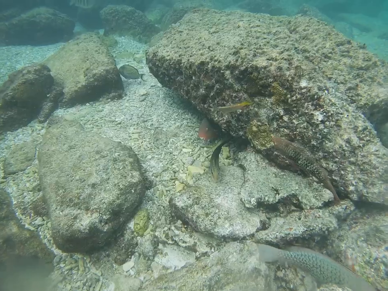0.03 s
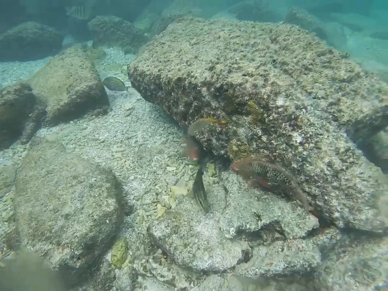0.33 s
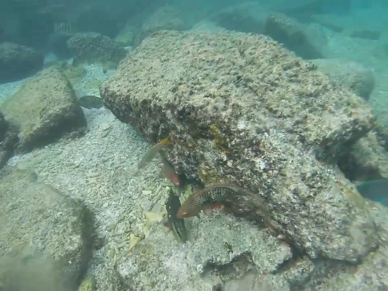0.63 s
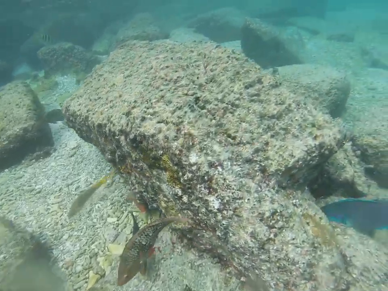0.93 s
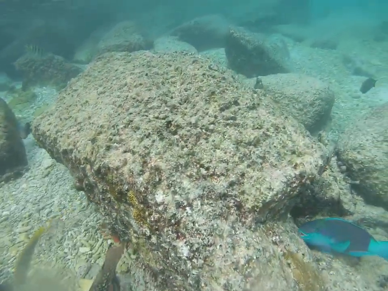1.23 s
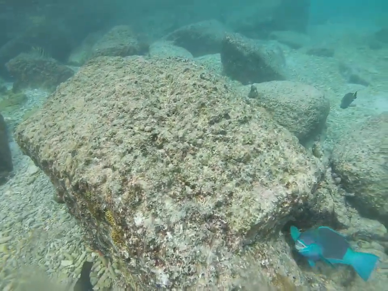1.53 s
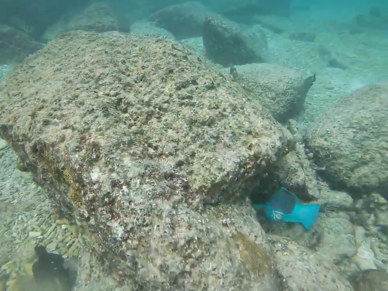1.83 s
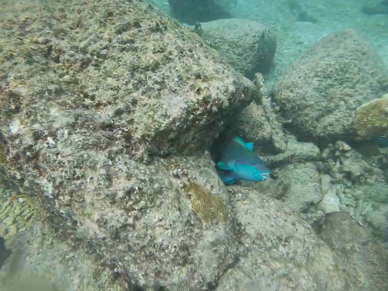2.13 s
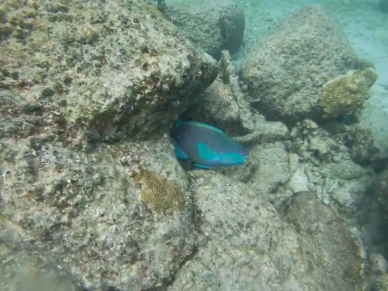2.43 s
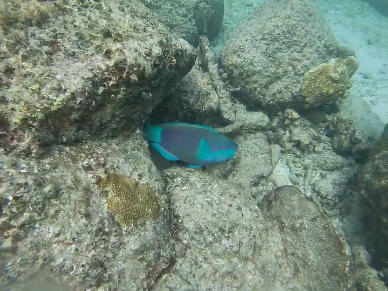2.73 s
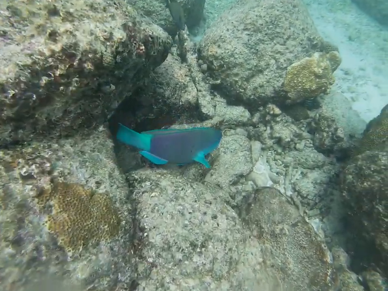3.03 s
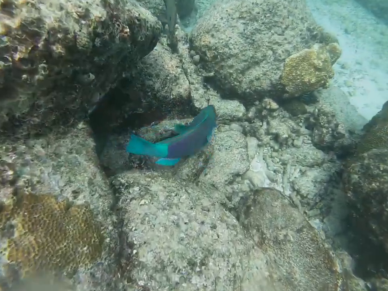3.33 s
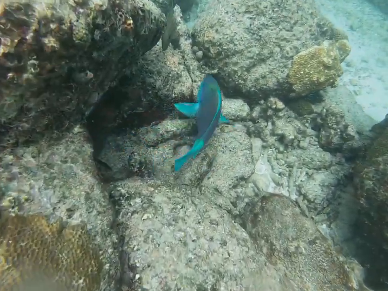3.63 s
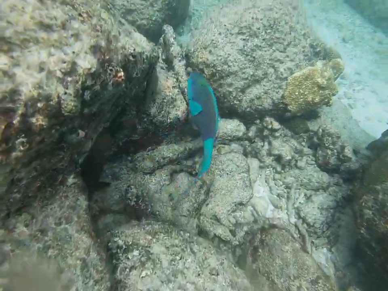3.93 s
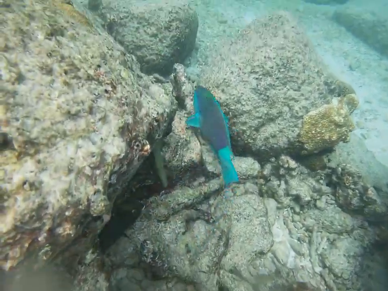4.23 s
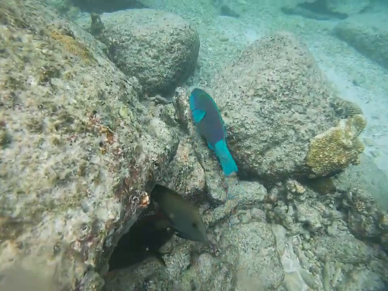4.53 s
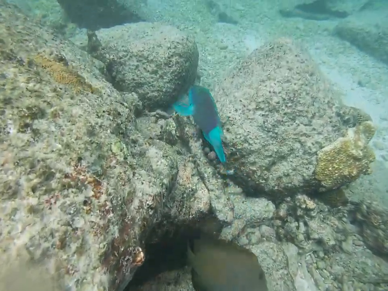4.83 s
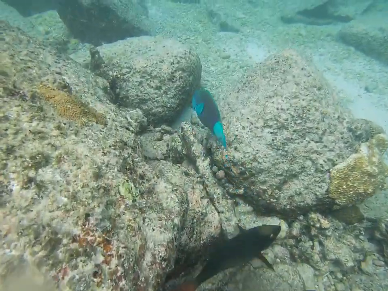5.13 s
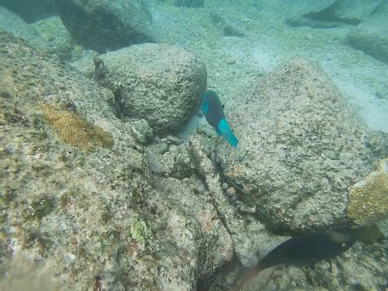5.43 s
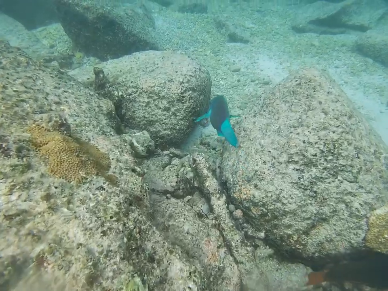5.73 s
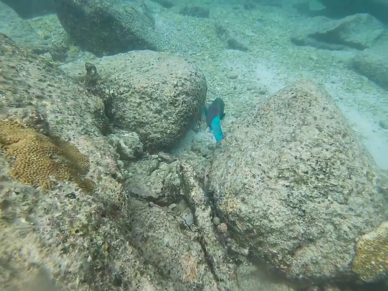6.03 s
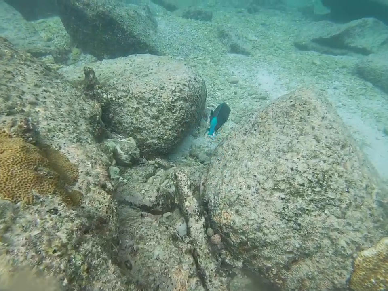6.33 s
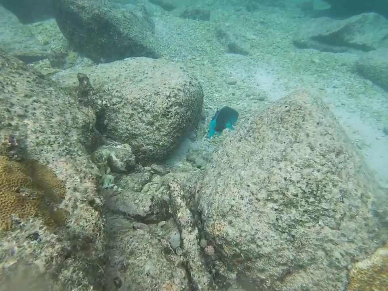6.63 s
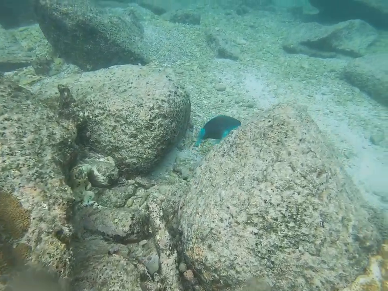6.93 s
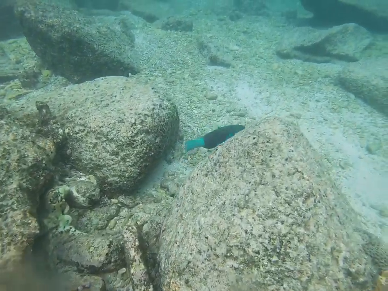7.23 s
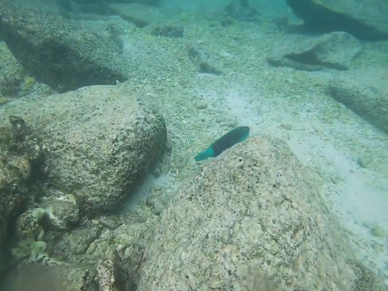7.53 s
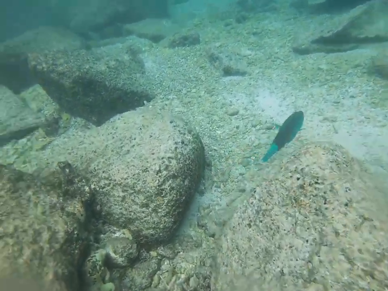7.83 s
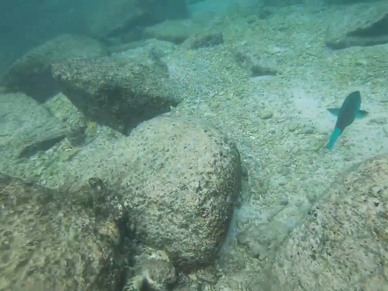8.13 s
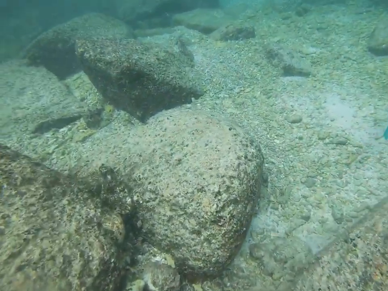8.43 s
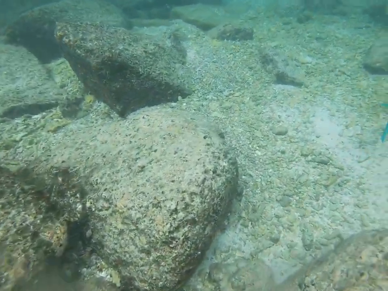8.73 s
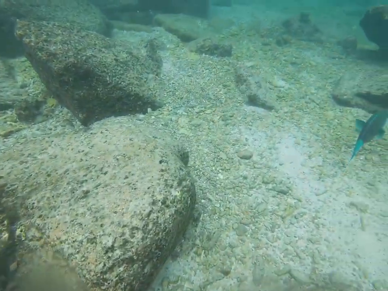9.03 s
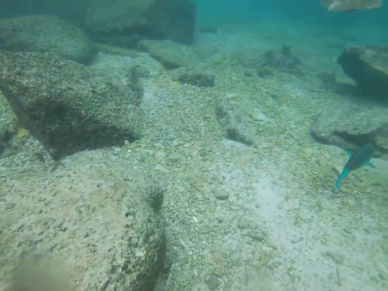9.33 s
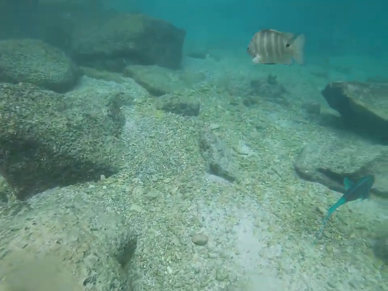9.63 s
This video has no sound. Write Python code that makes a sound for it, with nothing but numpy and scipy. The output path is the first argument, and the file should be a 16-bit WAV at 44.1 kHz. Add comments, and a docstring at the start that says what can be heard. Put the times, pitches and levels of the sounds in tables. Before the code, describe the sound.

Heard from inside a waterproof camera case swimming over a reef, water rumbles and buffets in uneven waves. Shrimp crackle faintly all along, with a few sharper snaps nearby, while the handled case clicks and knocks and little bubbles ring. A short gush and a knock come early; a deep thump and a gurgling surge come near the end.

```python
"""Swimming over a rocky reef

A camera in a waterproof case swims along; eddies rumble, buffet and gurgle past it.
Snapping shrimp crackle near and far, each snap a collapsing cavity heard through the case.
The case knocks, ticks and scrapes in the hand, water bumps and gushes on it, and small bubbles ring."""
import sys
import numpy as np
from scipy import signal
from scipy.fft import rfft, irfft, next_fast_len
from scipy.io import wavfile
from scipy.ndimage import uniform_filter1d

SR = 44100
rng = np.random.default_rng(int(sys.argv[2]) if len(sys.argv) > 2 else 0)


def store_wav(level_fs):
    """Save 16-bit WAV to argv[1]."""
    pcm = np.round(np.clip(np.atleast_2d(level_fs), -1, 1) * 32767)
    wavfile.write(sys.argv[1], SR, pcm.T.astype(np.int16))


N = 431738
TIME = np.arange(N) / SR
TAPS = 4096
HZ = np.fft.rfftfreq(TAPS, 1 / SR)


def amp(db):
    """Decibels to gain."""
    return 10 ** (np.asarray(db) / 20)


def unit_rms(x):
    """Scales to rms 1."""
    return x / np.sqrt(np.mean(x ** 2) + 1e-20)


def unit_peak(x):
    """Scales the loudest 1.5 ms to rms 1."""
    return x / np.sqrt(uniform_filter1d(x ** 2, 66).max() + 1e-20)


def steadied(x, steady_s):
    """Evens a sound to rms 1 over spans longer than steady_s."""
    power = abs(signal.hilbert(x)) ** 2 / 2
    span = int(steady_s * SR)
    return x / np.sqrt(abs(uniform_filter1d(uniform_filter1d(power, span), span)) + 1e-20)


def add(mix, start_s, sound):
    """Mixes a sound in at start_s."""
    part = mix[max(round(start_s * SR), 0):][:len(sound)]
    part += sound[:len(part)]


def eq(points, hz=HZ):
    """Gain along a curve of (freq_hz, gain_db) points."""
    freq_hz, gain_db = np.transpose(points)
    return amp(np.interp(np.log(hz + 1), np.log(freq_hz + 1), gain_db))


def body(modes, shift=1, top_hz=11940):
    """Gain of steep-sided resonances; the case passes little above top_hz."""
    power = sum((amp(db) / (1 + 2 * ((HZ / shift - hz) / width) ** 2) ** 1.04) ** 2
                for hz, width, db in modes)
    return np.sqrt(power) / (1 + (HZ / top_hz) ** 12)


def ring(drive, colour):
    """Rings a drive through the minimum-phase filter of this colour."""
    log_gain = np.log(np.maximum(np.r_[colour, colour[-2:0:-1]], 1e-5))
    response = np.fft.ifft(np.exp(np.conj(signal.hilbert(log_gain)))).real
    return signal.oaconvolve(drive, response[:TAPS // 2])


def impact(scatter, decay_s, size=2048):
    """One impulse and its quickly fading scatter."""
    drive = rng.standard_normal(size) * np.exp(-np.arange(size) / SR / decay_s)
    drive *= scatter / np.linalg.norm(drive)
    drive[0] += 1
    return drive


def clicks(per_s, spread_db, max_spreads, size=N):
    """Random impulses, most small and a few large."""
    gains = amp(spread_db * np.minimum(rng.exponential(1, size), max_spreads))
    return gains * rng.choice([-1, 1], size) * (rng.random(size) < per_s / SR)


def eddies(colour, steady_s):
    """Low turbulent noise of even strength."""
    size = next_fast_len(N)
    spectrum = rfft(rng.standard_normal(size)) * eq(colour, np.fft.rfftfreq(size, 1 / SR))
    return steadied(irfft(spectrum, size), steady_s)[:N]


def ping(hz, t60_s, rise_s, glide):
    """A damped sine that starts softly and glides as it dies."""
    t = np.arange(int(t60_s * SR)) / SR
    envelope = (1 - np.exp(-t / rise_s)) * amp(-60 * t / t60_s)
    return envelope * np.sin(2 * np.pi * hz * t * (1 + glide * t / t60_s))


def bubbling(colour, per_s, cycles, spread_db):
    """Bubbles of every size at random moments, each ringing for roughly this many cycles."""
    out = np.zeros(N)
    low_hz, high_hz = colour[0][0], colour[-1][0]
    for when, pitch, strength, sustain in rng.random((int(per_s * N / SR), 4)):
        hz = low_hz * (high_hz / low_hz) ** pitch
        gain = eq(colour, hz) * amp(spread_db * min(-np.log(1 - strength), 3))
        bubble = ping(hz, cycles * (.5 + sustain) / hz, rise_s=1.5 / hz, glide=.042)
        add(out, when * N / SR, gain * bubble)
    return unit_rms(out)


def wander(level_db, depth_db, top_hz=6):
    """A gain that drifts around level_db, at rates in the two octaves below top_hz."""
    t = np.linspace(0, N / SR, 1000)
    rates = top_hz * np.geomspace(.25, 1, 24)
    drift = sum(np.sin(2 * np.pi * (hz * t + turn)) for hz, turn in zip(rates, rng.random(24)))
    return amp(level_db + depth_db * np.interp(TIME, t, unit_rms(drift)))


def swell(middle_s, length_s):
    """A smooth rise and fall of height 1."""
    return np.cos(np.pi * np.clip((TIME - middle_s) / length_s, -.5, .5)) ** 2


def burst(length_s, rise_share=.2, fade_db=16):
    """An envelope that builds quickly, is fade_db down at length_s and dies away."""
    age = np.arange(int(2 * length_s * SR)) / (length_s * SR)
    fade = np.maximum(age - rise_share, 0) / (1 - rise_share)
    return np.minimum(age / rise_share, 1) * amp(-fade_db * fade ** 1.15)


def bursts(rows):
    """The summed envelope of a table of bursts."""
    level = np.zeros(N)
    for start_s, length_s, db, *_ in rows:
        add(level, start_s, amp(db) * burst(length_s))
    return level


def strays(*ranges, per_s, level_db):
    """Rows for faint random events: start_s, level_db, then a value from each range."""
    limits = [(0, N / SR), (level_db - 2, level_db + 2), *ranges]
    return [[rng.uniform(*span) for span in limits] for _ in range(round(per_s * N / SR))]


# Flow past the case as the swimmer speeds up and drifts: time_s, level_db
FLOW = [(0, -42.5), (.6, -44.5), (1.0, -39.5), (1.38, -38), (1.6, -29), (2.7, -29.5), (3.5, -33),
        (4.3, -32.5), (4.9, -42), (5.3, -32), (5.9, -35.5), (6.55, -41), (7.2, -37.5), (7.9, -27.5),
        (8.42, -36), (8.85, -30.5), (9.2, -34), (9.79, -42)]
CRUISE_DB = -35


def flow(reference_db=0):
    """Strength of the flow against a reference level."""
    time_s, db = np.transpose(FLOW)
    return amp(np.interp(TIME, time_s, db) - reference_db)


# Shoves of water, one swell of rumble each: middle_s, length_s, level_db
PUSHES = [(1.155, 0.3, -30.5), (1.632, 0.23, -27.5), (2.356, 0.052, -21.5), (2.574, 0.035, -20.5),
          (3.738, 0.1, -27), (4.549, 0.1, -27), (5.544, 0.064, -21.5), (6.983, 0.34, -32),
          (7.473, 0.29, -28.5), (7.879, 0.2, -20.5), (8.222, 0.29, -25.5), (8.608, 0.11, -26.5),
          (8.842, 0.37, -27)]
# Tone of the slow sway and of the large eddies: freq_hz, gain_db
SWAY_EQ = [(2, -18.5), (8, -5), (13.5, -7.5), (17, -3), (22, -15), (40, -54.5), (100, -100), (6000, -145)]
RUMBLE_EQ = [(10, -13.5), (20, -3.5), (28, 2), (33, 2), (39, -16), (50, -15), (70, -28.5), (120, -56),
             (300, -83), (900, -100), (6000, -140)]


def rumble():
    """The case sways and large eddies rumble, growing with the flow."""
    level = flow() * wander(-2, depth_db=2)
    for middle_s, length_s, db in PUSHES:
        level = np.hypot(level, amp(db) * swell(middle_s, length_s))
    sway = amp(-1) * eddies(SWAY_EQ, steady_s=.095)
    return level * (sway + amp(.5) * eddies(RUMBLE_EQ, steady_s=.097))


# Jolts of the case that shed eddies: start_s, length_s, level_db
JOLTS = [(.45, 0.15, -32), (1.1, 0.053, -40), (1.56, 0.078, -35), (1.88, 0.17, -61), (2.28, 0.24, -42),
         (2.57, 0.14, -52), (3.5, 0.47, -48.5), (3.7, 0.063, -57), (4.28, 0.22, -50.5), (7.76, 0.14, -25.5),
         (8.15, 0.3, -45), (8.57, 0.23, -41.5), (8.88, 0.084, -36.5), (9.39, 0.16, -37)]
# Tone of the buffeting: freq_hz, gain_db
BUFFET_EQ = [(25, -31), (50, -15), (68, -1.5), (82, 11.5), (110, -5), (200, -15.5), (400, -46), (1000, -91)]


def buffeting():
    """Smaller eddies beat on the case, harder with the flow and at each jolt."""
    level = np.hypot(flow(CRUISE_DB) ** .91 * wander(-62, depth_db=3), bursts(JOLTS))
    return amp(-5.5) * level * eddies(BUFFET_EQ, steady_s=.11)


# Gurgles round the case: start_s, length_s, level_db, pitch_hz
GURGLES = [(0.465, 0.39, -38, 174.1), (0.685, 0.07, -39, 184), (0.829, 0.35, -58.5, 191.4),
           (1.499, 0.055, -49.5, 145.5), (1.566, 0.051, -49, 151), (1.575, 0.097, -57.5, 371),
           (1.721, 0.22, -60, 163.6), (1.972, 0.036, -56, 360), (1.892, 0.13, -48, 150.8),
           (2.583, 0.038, -48, 188), (3.203, 0.12, -45.5, 211.4), (3.238, 0.052, -51, 382),
           (3.309, 0.095, -56, 245), (3.561, 0.075, -54, 152), (3.702, 0.066, -66, 152),
           (4.004, 0.056, -44, 160.3), (4.267, 0.041, -53.5, 143), (4.633, 0.034, -62, 384),
           (4.804, 0.15, -54.5, 199.4), (5.779, 0.028, -56, 385), (6.217, 0.42, -60.5, 220.6),
           (6.892, 0.053, -45, 191), (7.361, 0.12, -53.5, 243), (7.672, 0.049, -46, 230),
           (7.764, 0.11, -36.5, 210.7), (7.977, 0.048, -50.5, 169), (8.277, 0.021, -32, 219),
           (8.341, 0.082, -46.5, 220), (8.562, 0.1, -52.5, 168.6), (8.38, 0.092, -53, 386),
           (8.808, 0.13, -44, 188.6), (8.83, 0.074, -55, 380), (8.836, 0.74, -55.5, 205),
           (9.446, 0.47, -56, 201.3), (9.72, 0.065, -48.5, 160)]
# Tone of a gurgle pitched at GURGLE_HZ: freq_hz, gain_db
GURGLE_EQ = [(50, -27.5), (120, -4.5), (160, 5), (210, 0.5), (290, -6), (400, -8.5), (550, -21.5),
             (1000, -20.5), (3000, -94)]
GURGLE_HZ = 172.6


def gurgling():
    """Small eddies and gulps of air: a faint trickle, and bursts at their own pitches."""
    gulps = bubbling(GURGLE_EQ[1:-2], per_s=120, cycles=16, spread_db=1.2)
    churn = amp(-8) * eddies(GURGLE_EQ, steady_s=.029) + amp(-7) * gulps
    out = churn * flow(CRUISE_DB) ** .2 * wander(-67.5, depth_db=3)
    for start_s, length_s, db, hz in GURGLES:
        level = amp(db) * burst(length_s)
        playhead = (start_s * SR + np.arange(len(level)) * hz / GURGLE_HZ) % N
        add(out, start_s, level * np.interp(playhead, np.arange(N), churn))
    return out


def lull():
    """A brief dip in the crackle and rustle."""
    return amp(-6 * swell(middle_s=1.35, length_s=.74))


# Resonances that let sound from the water into the case: freq_hz, width_hz, gain_db
CASE_MODES = [(810, 208, -0.5), (1382, 188, 11), (1763, 112, 5), (2145, 370, -1), (2732, 214, 0),
              (3130, 680, -3.5), (4070, 350, -2.5), (5120, 490, -2), (5905, 860, -10), (8106, 790, -14.5),
              (9330, 2400, -21), (12100, 600, -28), (14300, 730, -33)]


def shrimp_crackle():
    """Countless far snaps merge into a sizzle; nearer colonies stand out."""
    case = body(CASE_MODES)
    far = unit_rms(ring(clicks(5000, 1.2, 2.1), case)[:N])
    near = np.zeros(N)
    for centre_hz in np.geomspace(2200, 9500, 14):  # each colony has its own brightness
        colour = case / (1 + (np.log2(HZ / centre_hz + 1e-3) / .2) ** 2)
        snaps = signal.oaconvolve(clicks(26, 2.9, 3), impact(scatter=24, decay_s=.01))
        near += ring(snaps, colour)[:N]
    return lull() * wander(-61, depth_db=.23, top_hz=1.334) * unit_rms(far + .75 * unit_rms(near))


# Resonances of a small stiff fitting on the case: freq_hz, width_hz, gain_db
FITTING_MODES = [(227, 290, -25.5), (900, 200, -60), (1414, 120, 10), (1904, 380, -8.5)]
# Strength of stray bubbles by pitch: pitch_hz, gain_db
PIP_EQ = [(700, -16), (850, 2), (1100, -12), (1450, 13), (1900, -9.5), (2500, -1), (3400, -21.5)]


def rustle():
    """Water rustles and pips on the case, louder when it gurgles."""
    level = np.hypot(lull() * wander(-59, depth_db=4.5), amp(-2.5) * bursts(GURGLES))
    patter = unit_rms(ring(clicks(400, 2.2, 5.5), body(FITTING_MODES))[:N])
    pips = bubbling(PIP_EQ, per_s=190, cycles=27, spread_db=2.6)
    return level * (amp(-10) * patter + amp(-8) * pips)


# Passing bubble clouds: start_s, length_s, level_db
SWISHES = [(-0.003, 0.32, -57.5), (0.444, 0.28, -55), (3.179, 0.063, -49), (4.735, 0.13, -54.5),
           (5.27, 0.34, -57.5), (7.006, 0.2, -57.5), (8.654, 0.48, -51.5), (9.184, 0.58, -54.5)]
# Strength of their bubbles by pitch: pitch_hz, gain_db
SWISH_EQ = [(500, -44), (1000, -68), (1300, 13), (1600, 12.5), (1900, 4), (2300, 4), (3000, -34), (6000, 4)]


def swishes():
    """Clouds of fine bubbles swell and pass."""
    level = np.zeros(N)
    for start_s, length_s, db in SWISHES:
        add(level, start_s, amp(db) * signal.windows.tukey(int(length_s * SR), .8))
    return level * bubbling(SWISH_EQ, per_s=1800, cycles=22, spread_db=2)


# Single bubbles, and the 1.1 kHz ring left by the knock at 8.28 s: start_s, level_db, pitch_hz, ring_s
BUBBLES = [(.112, -34.5, 1430, 0.03), (.195, -34.5, 945, 0.037), (.428, -39, 1180, 0.044),
           (.955, -23, 1473, 0.056), (1.045, -49, 880, 0.058), (1.478, -41, 1440, 0.046),
           (5.385, -49.5, 620, 0.072), (6.165, -38, 1260, 0.047), (6.313, -35.5, 840, 0.047),
           (6.718, -43.5, 1820, 0.052), (6.915, -43, 833, 0.062), (8.281, -30, 1100, 0.058),
           (8.786, -31.5, 1345, 0.045), (8.992, -38, 1310, 0.039), (9.068, -45.5, 1750, 0.096),
           (9.712, -32, 1810, 0.03)]


def bubbles():
    """Each small bubble rings, rising a touch in pitch; the knock at 8.28 s rings on the same way."""
    out = np.zeros(N)
    for start_s, db, hz, ring_s in BUBBLES:
        add(out, start_s, amp(db) * ping(hz, ring_s, rise_s=.0031, glide=.0066))
    return out


# Resonances of the case wall, struck directly: freq_hz, width_hz, gain_db
WALL_MODES = [(188, 71, -3), (380, 160, -17), (852, 91, 7), (1053, 47, -0.5), (1265, 180, 1.5),
              (1752, 56, -9)]


def wall(thud_db, edge_db, upper_db=0, shift=1):
    """The wall's hollow colour, with a bright edge from the case modes."""
    hollow = eq([(330, -3.5), (480, .5), (620, 3), (800, .5), (950, -3.5), (1090, 4.5), (1300, 3.5)])
    weight = eq([(250, thud_db), (700, 0), (900, 0), (1150, upper_db)])
    return hollow * (body(WALL_MODES, shift) * weight + amp(edge_db) * body(CASE_MODES))


# Dull knocks on the wall: start_s, level_db, thud_db, upper_modes_db
KNOCKS = [(0.192, -47.5, -10, -5), (0.209, -51, -22, -4), (0.299, -47, -6, -2), (0.396, -37, -35, -4),
          (0.543, -46, 8, -8), (0.6543, -24.5, -11, -3), (0.793, -41.5, -12, 9), (0.833, -47.5, 0, -10),
          (1.01, -48.5, 16, -2), (1.103, -39.5, 20, -8), (1.588, -45, 11, 0), (1.892, -42, -6, 6),
          (1.922, -31, 2, 2), (2.05, -47, 1, -9), (2.321, -40, -11, 4), (2.364, -41.5, 10.5, -0.5),
          (2.788, -44.5, 5, 4), (2.854, -44, -2, -1), (3.004, -42, -23, 4), (3.072, -34.5, 1, 2),
          (3.427, -41.5, 11, -1), (3.48, -49, 12, -1), (3.519, -51, 0, -2), (3.616, -41, 5, 0),
          (3.655, -48.5, 7, -7), (3.735, -36, 0, -13), (3.885, -37, -2, -7.5), (3.918, -45, 4, -9),
          (4.019, -39.5, 3, -13), (4.038, -39.5, 6, -5), (4.092, -42.5, -4, -3), (4.282, -37.5, 2, -5.5),
          (4.358, -48, -10, 0), (4.545, -60, -4, 4), (4.697, -46, 2, 3), (4.728, -48.5, 4, 0),
          (5.168, -55, -5, -2), (5.37, -51, 17, -5), (5.514, -40.5, 0, 0), (5.71, -46.5, -5, 4),
          (5.797, -48.5, -10, -5), (5.985, -47, -4, 5), (6.632, -47, -5, 4), (7.016, -37.5, -6, -5),
          (7.288, -41, -6, 1), (7.865, -36, 9, -5), (8.272, -38, 8, -2), (8.279, -36.5, -18, -1),
          (8.407, -40.5, -2, -1), (8.444, -40, -6, 1), (8.467, -48, 0, -5), (8.589, -32, -8, -3.5),
          (8.842, -51, 9, 1), (9.032, -46.5, -8, -8), (9.117, -42, 6, 7), (9.599, -44, -10, 2)]


def knocks(rise_s=.00049, rattle_s=.0085):
    """Soft contacts build, rattle out and ring the wall."""
    out = np.zeros(N)
    t = np.arange(2048) / SR
    force = t / rise_s * np.exp(1 - t / rise_s) + amp(-8.5) * np.exp(-t / rattle_s)
    for start_s, db, thud_db, upper_db in KNOCKS + strays((-8, 8), (-8, 4), per_s=1.2, level_db=-52):
        shift = 1 + .06 * rng.uniform(-.79, 1)  # pitch varies with where the wall is struck
        colour = wall(thud_db, edge_db=-36, upper_db=upper_db, shift=shift)
        knock = ring(force * rng.standard_normal(len(t)), colour)
        add(out, start_s, amp(db - 2) * unit_peak(knock))
    return out


# Close shrimp snaps: start_s, level_db, low_mids_db, top_db
SNAPS = [(0.2398, -44, -6, -22), (0.545, -44.5, -5, -22), (0.641, -48, -2, -26), (0.6557, -43.5, -22, -12),
         (0.9012, -51, 2, -10), (0.9649, -45.5, -12, -22), (1.194, -41, 1, -9.5), (1.293, -47.5, -12, -37),
         (1.3472, -47.5, -15.5, -41), (1.511, -51.5, -13, -11), (1.538, -58, -15, -12),
         (1.58, -52, -27, -11), (1.626, -45.5, -2, -20), (1.611, -45.5, -3, -22), (1.661, -52, -10, -8),
         (1.712, -46.5, 9, -7), (2.045, -43, 7, -13), (2.116, -45.5, -11, -23), (2.2278, -49, -22, -28),
         (2.334, -43, -2, -15), (2.3202, -34, -9, -28), (2.8025, -37, -5.5, -31), (3.637, -39, 3, -24),
         (3.705, -41.5, -18, -24), (3.9555, -42.5, -8, -14.5), (4.13, -48.5, -13, -10),
         (4.378, -48.5, -7, -36), (4.437, -48.5, 13, 4), (5.015, -54.5, -31, -11),
         (5.3966, -47.5, -13, -25), (5.5702, -48.5, -35, -19), (5.7564, -54.5, -22, -8),
         (6.0015, -35.5, 1, -22), (6.1501, -33, -16.5, -23), (6.337, -47, -8, -13), (6.992, -41, -12, -25),
         (7.117, -51.5, -17, -14), (7.255, -36, -13, -16), (7.472, -48, -8, -15), (7.532, -35, 2.5, -16),
         (7.886, -51, 10, 1), (8.282, -58, 11, -17), (8.4847, -51.5, 5, -4), (9.032, -31.5, -13.5, -19),
         (9.28, -46.5, -4, -2), (9.314, -54, 2, -11)]


def shrimp_snaps(rise_s=.00045, echo_s=.0042, tail_s=.01, echo_hz=5200):
    """A cavity collapses with a crack; rock scatters a duller echo and the reef a crackly tail."""
    out = np.zeros(N)
    t = np.arange(2048) / SR
    for start_s, db, mid_db, top_db in SNAPS + strays((-18, 0), (-26, -8), per_s=3.5, level_db=-58):
        tilt = eq([(900, mid_db - 14.5), (2800, mid_db + .5), (4400, .67 * mid_db), (5700, -1),
                   (6900, -3.5), (8500, top_db + 21.5), (11000, top_db + 10)])
        colour = body(CASE_MODES) * tilt
        collapse, scatter = rng.standard_normal((2, len(t)))
        crack = ring(collapse * t / rise_s * np.exp(1 - t / rise_s), colour)
        echo = amp(.35 * mid_db - 1.5) * scatter * np.exp(-t / echo_s)
        tail = amp(-13.5) * unit_rms(clicks(2500, 2.2, 3, len(t))) * np.exp(-t / tail_s)
        reflections = ring(echo + tail, colour / (1 + (HZ / echo_hz) ** 2))
        add(out, start_s, amp(db) * unit_peak(crack + reflections))
    return out


# Bright ticks of the case's small parts: start_s, level_db, pitch_hz
TICKS = [(0.288, -47, 1730), (0.304, -44.5, 2720), (0.574, -47, 2700), (0.665, -48, 3020),
         (0.733, -33, 1490), (1.922, -36, 1420), (2.5, -43, 1410), (2.52, -42, 1402), (2.994, -44, 1350),
         (3.199, -42, 1510), (3.2117, -40.5, 1380), (3.3675, -48, 1350), (3.4102, -42.5, 1455),
         (3.434, -42, 1490), (3.498, -46, 1530), (3.518, -51, 1440), (3.7958, -45.5, 1360),
         (4.462, -44.5, 1480), (4.532, -48, 1380), (4.6372, -43.5, 1390), (4.857, -38.5, 1463),
         (5.1272, -41.5, 1460), (5.2144, -42, 1500), (5.3, -40.5, 1420), (5.431, -39, 1450),
         (5.73, -46.5, 1530), (6.0025, -35.5, 1540), (6.087, -43, 1480), (6.358, -48, 1390),
         (6.466, -45, 1430), (6.775, -40, 1505), (6.789, -40.5, 1470), (6.8405, -40.5, 1440),
         (7.0086, -40, 1450), (7.0977, -42.5, 1780), (7.139, -44, 1370), (7.271, -48, 2730),
         (7.291, -46, 2930), (7.314, -44, 1360), (7.423, -44, 2630), (7.529, -38, 1430),
         (7.7285, -42, 1450), (8.03, -39, 1387), (8.2794, -29.5, 1660), (8.374, -46.5, 3090),
         (8.443, -43, 1470), (8.557, -50.5, 2660), (8.73, -42.5, 1330), (9.641, -42, 2730)]


def ticks():
    """A small stiff part makes contact and rattles briefly."""
    out = np.zeros(N)
    for start_s, db, hz in TICKS + strays((1300, 1700), per_s=1.2, level_db=-49):
        colour = body(FITTING_MODES, shift=hz / FITTING_MODES[2][0]) + amp(-16.5) * body(CASE_MODES)
        tick = ring(impact(scatter=1.36, decay_s=.0048), colour)
        add(out, start_s, amp(db - .5) * unit_peak(tick))
    return out


def slipping(length_s, colour, per_s, spread_db):
    """A run of tiny slips that rings one colour, at rms 1."""
    size = int(length_s * SR)
    sound = ring(clicks(per_s, spread_db, 4.6, size) * signal.windows.tukey(size, .25), colour)
    return sound / np.sqrt(np.mean(sound[:size] ** 2) + 1e-20)


# Hand scrapes: start_s, length_s, level_db
SCRAPES = [(0.33, 0.36, -52.5), (3.414, 0.12, -62), (4.007, 0.031, -59), (5.351, 0.036, -54.5),
           (7.758, 0.057, -55), (7.839, 0.062, -60), (8.271, 0.013, -40.5), (8.351, 0.15, -56.5),
           (9.296, 0.34, -61.5)]


def scrapes():
    """The hand slips over the case with a low crunch."""
    out = np.zeros(N)
    rasp = body(CASE_MODES) * eq([(1000, -21), (1700, 11), (2800, 9), (5000, -31)])
    crunch = wall(thud_db=9.9, edge_db=-22) + amp(-20.5) * rasp
    for start_s, length_s, db in SCRAPES:
        add(out, start_s, amp(db) * slipping(length_s, crunch, per_s=1100, spread_db=4))
    return out


# Soft bumps and gulps of water: start_s, level_db, pitch_hz, ring_s
BUMPS = [(.44, -33, 195, 0.063), (.49, -51, 107, 0.14), (.74, -40, 166, 0.25), (.93, -40, 224, 0.13),
         (1.104, -32.5, 150.5, 0.14), (1.922, -35.5, 280, 0.032), (1.577, -35.5, 169, 0.067),
         (1.731, -43, 151, 0.13), (1.97, -44, 172, 0.08), (2.23, -39, 74, 0.17), (2.69, -36, 62, 0.37),
         (3.241, -35.5, 167, 0.074), (3.65, -42, 166, 0.094), (3.735, -42.5, 178, 0.073),
         (4.02, -29.5, 162.5, 0.072), (4.279, -46, 210, 0.059), (6.905, -42, 74.6, 0.23),
         (6.918, -33, 212, 0.056), (7.781, -11, 30.9, 0.8), (7.79, -22, 84, 0.11), (8.274, -18, 172, 0.04),
         (8.602, -39, 193, 0.1), (9.505, -43.5, 153, 0.22), (7.31, -28.5, 450, 0.011),
         (7.68, -44, 300, 0.048), (8.82, -36, 199, 0.11), (9.375, -38.5, 198, 0.26), (9.4, -34, 103, 0.19)]


def bumps():
    """Water bumps the case with a low note that sags in pitch."""
    out = np.zeros(N)
    for start_s, db, hz, ring_s in BUMPS:
        add(out, start_s, amp(db) * ping(hz, ring_s, rise_s=.0049, glide=-.044))
    return out


# Gushes of water: start_s, length_s, level_db, pitch_hz
GUSHES = [(.490, .033, -33.2, 1370), (.515, .023, -31.7, 1400), (.536, .027, -34.3, 1420),
          (.582, .023, -36.4, 1430), (.611, .025, -39.3, 1330), (.636, .017, -35.7, 1430),
          (.677, .017, -39.7, 1330), (.691, .013, -40.7, 1350), (.700, .021, -32.7, 1330),
          (1.897, .017, -44.7, 1300), (1.919, .015, -29.7, 1350), (7.760, .029, -32.7, 1330),
          (7.777, .043, -35.2, 1420), (7.808, .021, -33.7, 1330), (7.856, .023, -41.7, 1330),
          (8.274, .019, -31.3, 1450), (8.445, .058, -51.7, 1330), (8.602, .052, -47, 1320)]
# Resonances a gush rings: freq_hz, width_hz, gain_db
GUSH_MODES = [(314, 230, -14), (891, 97, 4.5), (1093, 53, 0), (1394, 135, 5.5), (1810, 260, -8.5),
              (2710, 830, -25.5), (5030, 880, -29.5)]


def gushes():
    """Water squeezes past in soft lumps, each a spray of tiny collapses ringing the wall."""
    out = np.zeros(N)
    for start_s, length_s, db, hz in GUSHES:
        size = int(length_s * SR)
        spray = ring(clicks(9000, 1, 3, size + TAPS), body(GUSH_MODES, shift=hz / GUSH_MODES[3][0]))
        lump = steadied(spray, steady_s=.005)[TAPS // 2:][:size]
        add(out, start_s, amp(db) * signal.windows.tukey(size, .8) * lump)
    return out


# Thin, high ring of a scratch: freq_hz, width_hz, gain_db
SCRATCH_MODES = [(8800, 460, 2), (5400, 2100, -3)]


def scratch(start_s=9.25, length_s=.085, level_db=-67):
    """Tiny slips make one short run of high clicks."""
    out = np.zeros(N)
    add(out, start_s, slipping(length_s, body(SCRATCH_MODES), per_s=450, spread_db=2.2))
    return amp(level_db) * out


def scene():
    """Everything reaches one microphone inside the case."""
    shrimp = shrimp_snaps() + shrimp_crackle()
    handling = knocks() + ticks() + scrapes() + scratch()
    water = rumble() + buffeting() + gurgling() + rustle() + swishes() + bubbles() + bumps() + gushes()
    return (shrimp + handling + water)[None]


def record(dry, cutoff_hz=15500):
    """The camera cuts off the highest treble."""
    lowpass = signal.firwin(101, cutoff_hz, window=("kaiser", 7), fs=SR)
    return signal.oaconvolve(dry, lowpass[None], "same")


dry = scene()
out = record(dry)
store_wav(out)
```